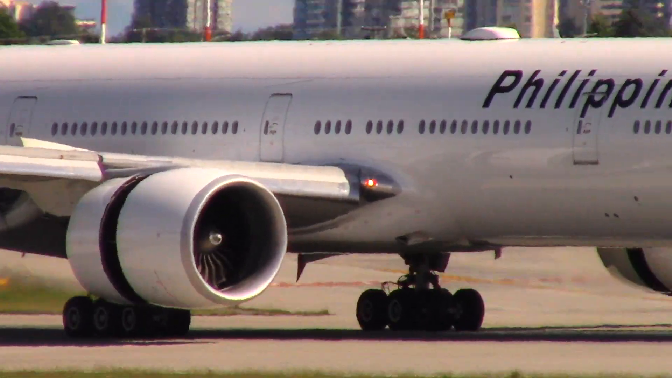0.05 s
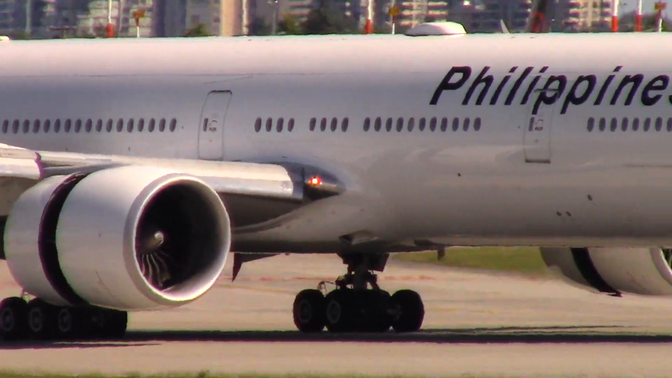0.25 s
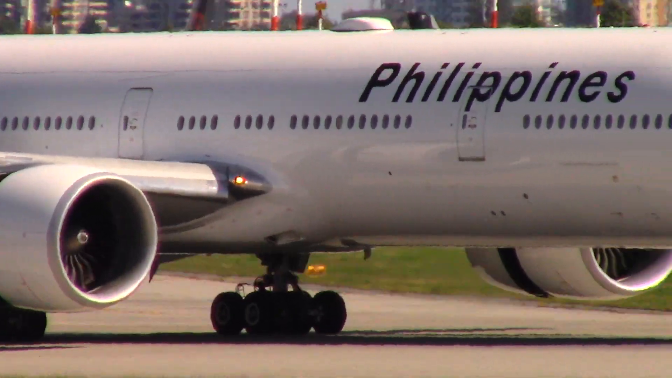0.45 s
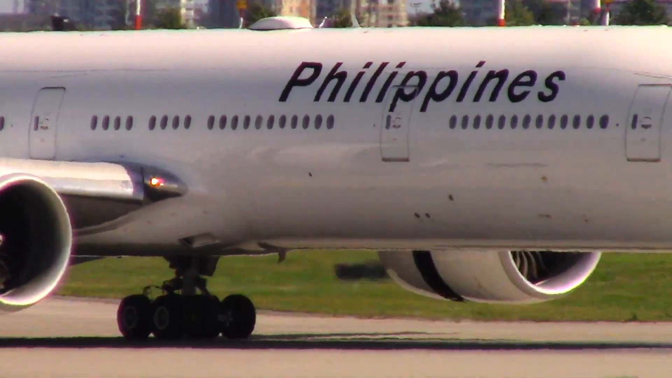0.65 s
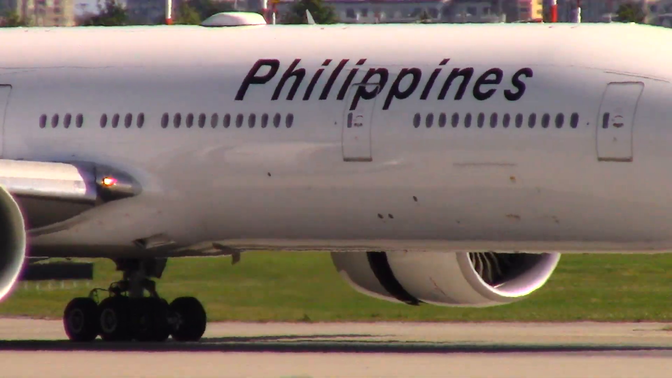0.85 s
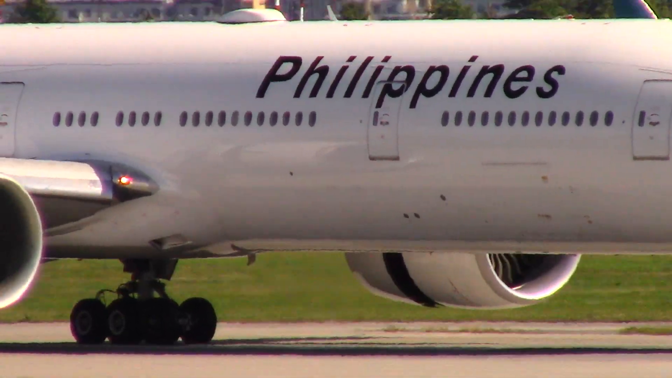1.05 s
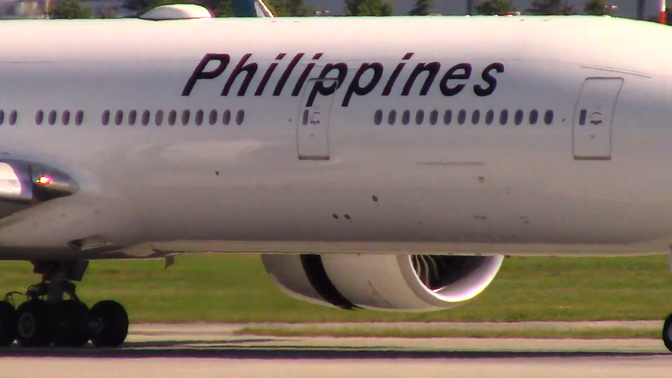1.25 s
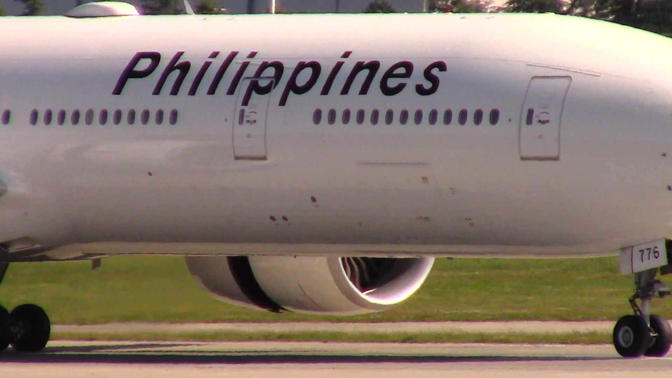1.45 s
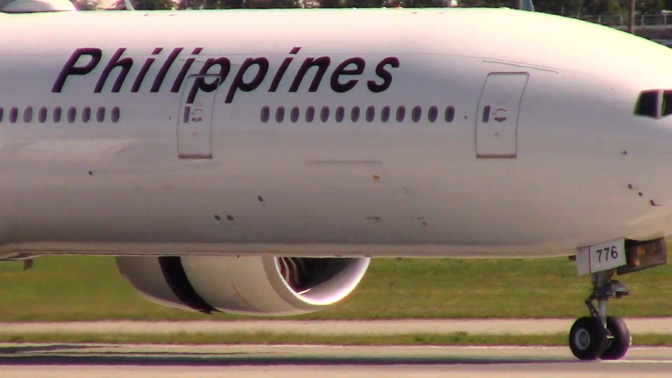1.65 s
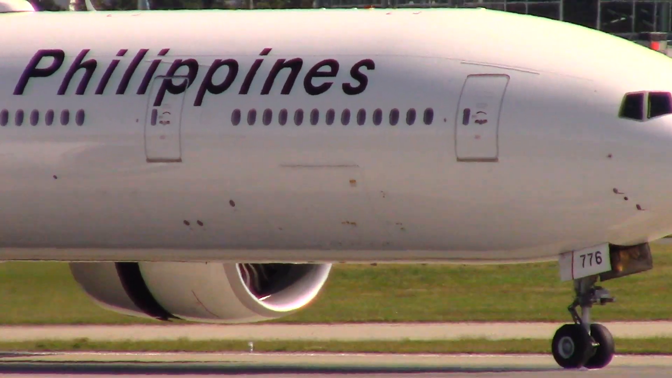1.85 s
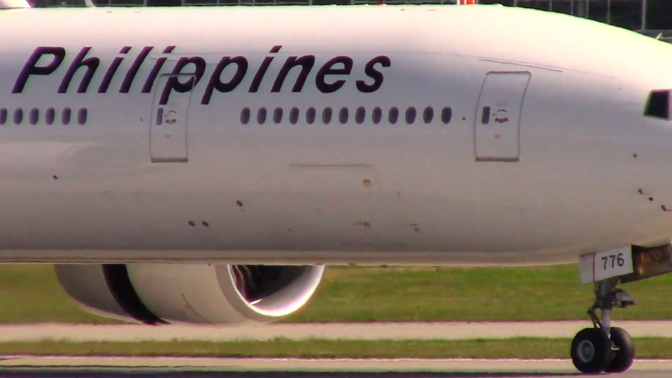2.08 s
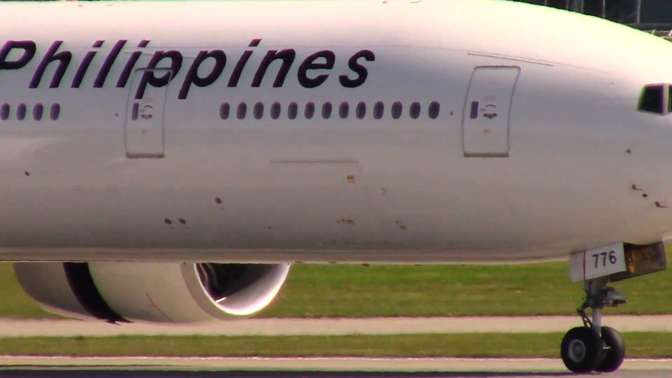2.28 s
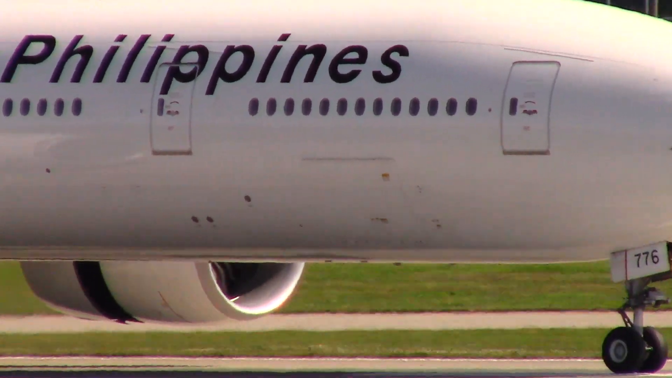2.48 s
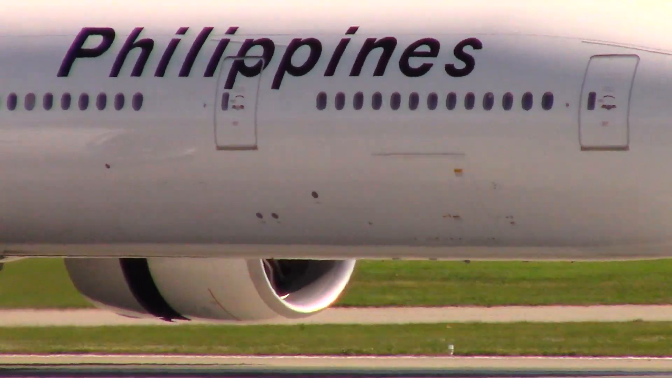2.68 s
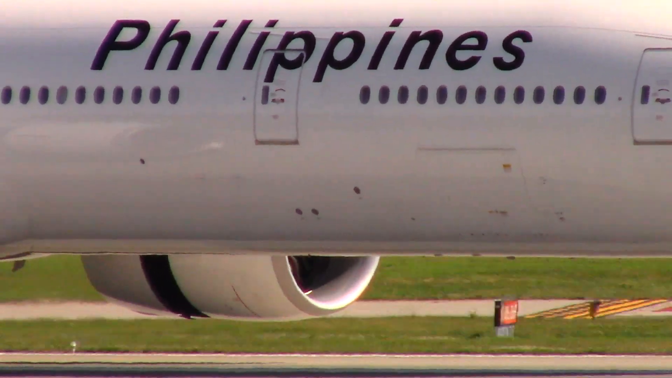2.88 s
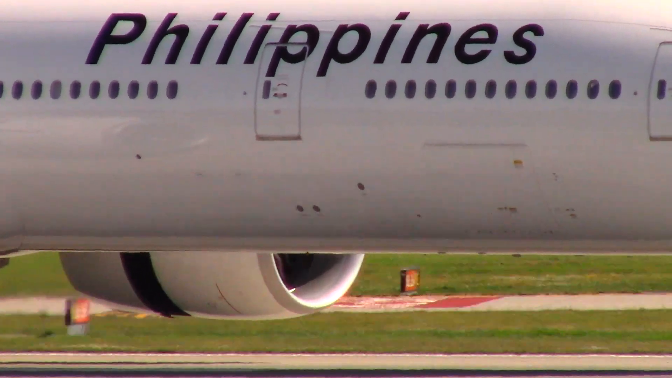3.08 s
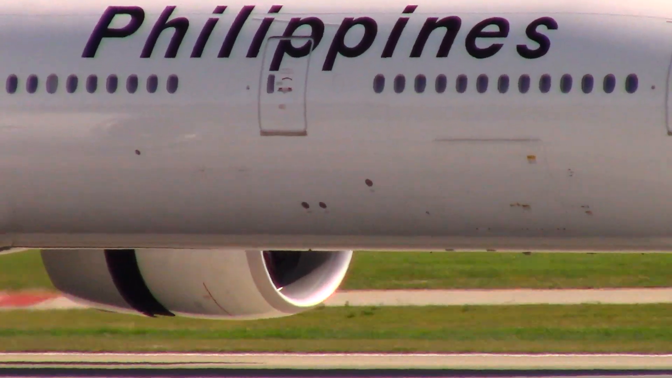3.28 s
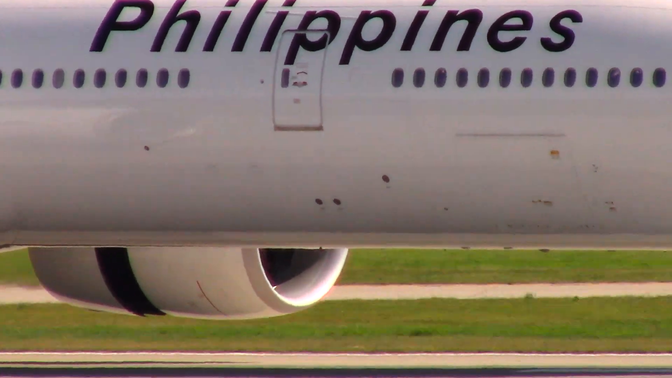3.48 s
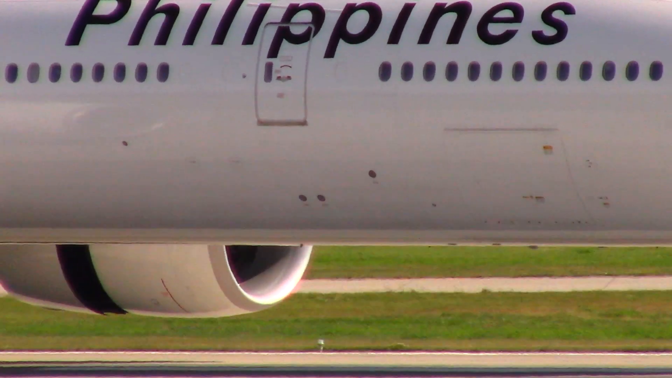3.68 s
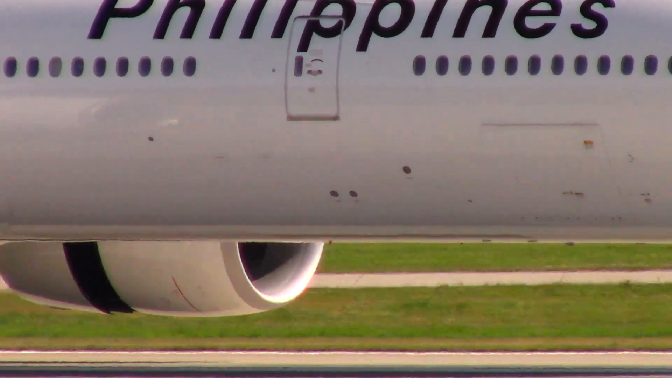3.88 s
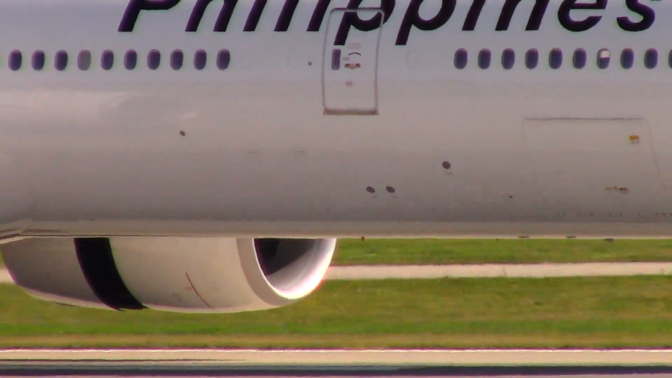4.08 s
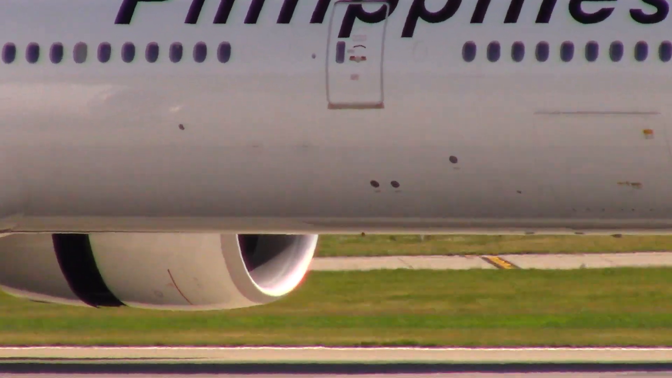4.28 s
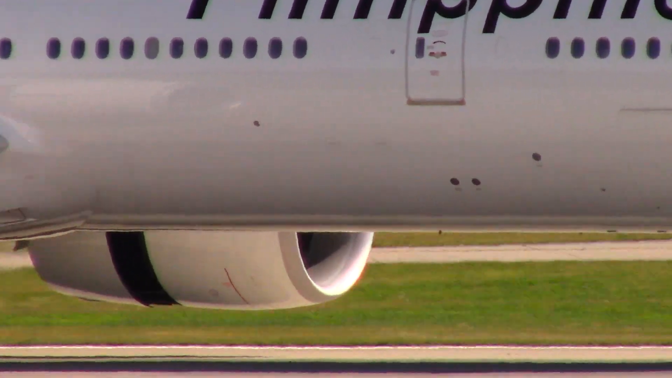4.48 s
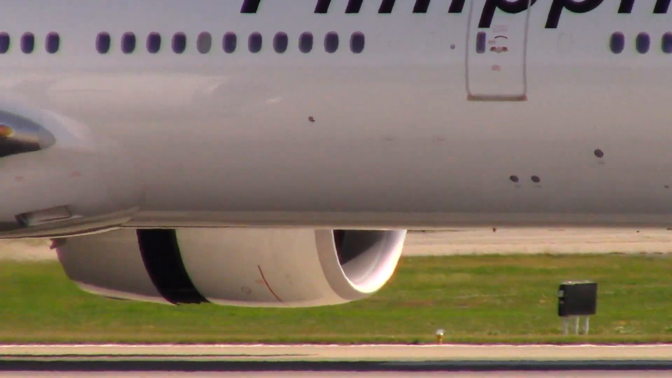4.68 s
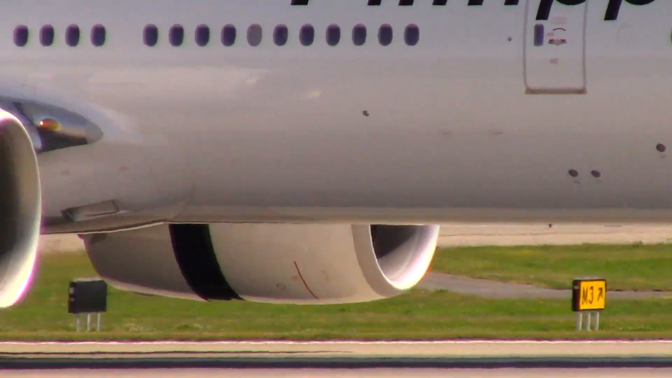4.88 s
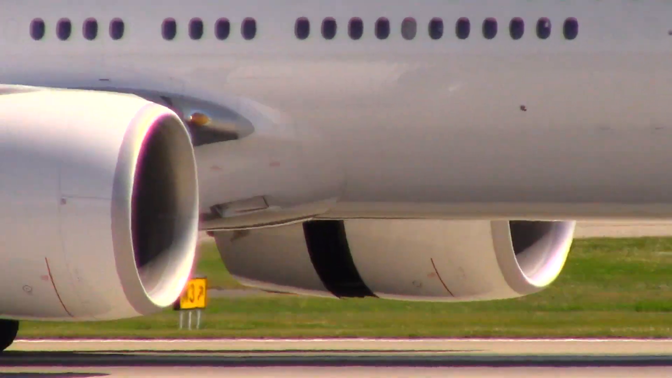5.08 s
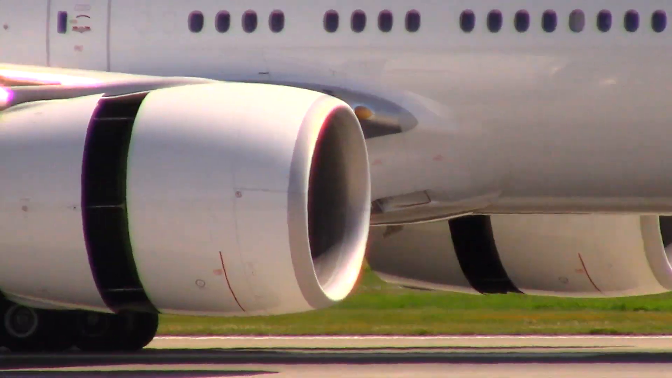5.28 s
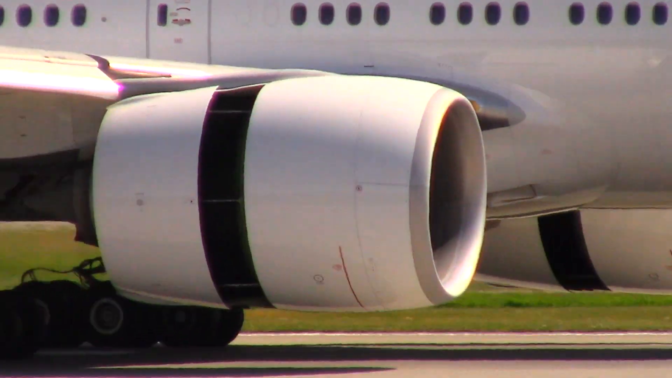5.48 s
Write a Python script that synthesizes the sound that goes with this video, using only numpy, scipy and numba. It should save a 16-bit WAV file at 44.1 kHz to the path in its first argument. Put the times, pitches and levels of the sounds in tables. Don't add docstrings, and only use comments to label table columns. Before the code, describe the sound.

A broad, turbulent jet roar builds beside a runway, threaded with flickering falling whines, early wind knocks and later faint overload crackle.

```python
import sys
import numpy as np
from scipy import signal
from scipy.fft import rfft, irfft
from scipy.io import wavfile
from scipy.ndimage import uniform_filter1d
from numba import njit

SR = 44100
rng = np.random.default_rng(int(sys.argv[2]) if len(sys.argv) > 2 else 0)


def wrap_up_sound(samples):
    columns = np.atleast_2d(samples).T
    tamed = np.clip(columns, -1, 1)
    steps = np.round(tamed * 32767).astype(np.int16)
    wavfile.write(sys.argv[1], SR, steps)


def boost_factor(decibels):
    exponent = np.asarray(decibels, float) / 20
    return 10 ** exponent


N = 244314
T = np.arange(N) / SR
HZ = np.maximum(np.fft.rfftfreq(N, 1 / SR), 1)


def shape(table, hz):
    table_hz, value = np.transpose(table)
    return np.interp(np.log(hz), np.log(table_hz), value)


def track(table):
    return np.interp(T, *np.transpose(table))


def bump(center_s, half_s):
    return np.exp(-((T - center_s) / half_s) ** 2)


def noise_spectrum(color, lo_hz, hi_hz):
    z = rfft(rng.standard_normal(N)) * boost_factor(shape(color, HZ))
    inside = (HZ > lo_hz) & (HZ < hi_hz)
    return z * N / np.sqrt(2 * np.sum(np.abs(z[inside]) ** 2))


def noise(color, lo_hz, hi_hz):
    return irfft(noise_spectrum(color, lo_hz, hi_hz), N)


def band(z, hz, octaves):
    offset = np.clip(np.log2(HZ / hz) / octaves, -1, 1)
    return irfft(z * np.cos(np.pi / 2 * offset) ** 2, N)


def walk(rate_hz):
    k = int(SR / rate_hz)
    held = rng.standard_normal(N // 200)[np.arange(N) // k]
    return 1.392 * uniform_filter1d(uniform_filter1d(held, k), k)


@njit
def svf(x, hz, width_hz):
    y, b, l = np.empty(len(x)), 0., 0.
    for i in range(len(x)):
        g, k = np.tan(np.pi * hz[i] / SR), width_hz / hz[i]
        v = (b + g * (x[i] - l)) / (1 + g * (g + k))
        b, l, y[i] = 2 * v - b, l + 2 * g * v, k * v
    return y


# start_s, level_db
ROAR_CORE = [(0, -36), (.5, -33.5), (.95, -28), (1.12, -26), (1.47, -23), (1.83, -29), (2.2, -26.5),
             (2.55, -23), (2.85, -22.5), (3.2, -19), (3.75, -17.5), (4.15, -18.5), (4.35, -19.5),
             (4.72, -24), (4.85, -20.5), (5.05, -17.5), (5.38, -21), (5.54, -21.5)]
# freq_hz, density_db_per_hz
JET_COLOR = [(150, -55.5), (300, -45), (400, -31), (540, -15), (820, -3.5), (1000, -4), (1370, 0),
             (1900, 0), (3500, -7), (4100, -10), (4900, -18), (5800, -24.5), (7000, -34.5), (11000, -65.5)]
# freq_hz, side_minus_mid_db
PORT_SIDE = [(250, -20.5), (700, -54), (1700, -48), (2500, -21), (3700, -22.5), (4600, -18), (5800, -11.5),
             (7200, -8.5), (9000, -11.5)]
ROAR_BANDS_HZ = [650, 1500, 4000, 6600, 8500]
LOSS_DB_PER_100M = [4.5, 0, 0.36, 7.5, 9]
FOLLOW_SHARE = [0.49, 0.91, 0.79, 0.52, 0.91]
# center_s, lift_db
FLARES = [(.8, 2), (1.28, 2), (2.2, 1), (2.48, 2), (2.8, 1), (3.15, 2), (4.11, 2), (4.83, 2), (5.03, 1.5)]
FLARE_SHARE = [0, 0, 0.91, .99, .99]


def roar():
    start_m, closing_m_s, near_m = 322.4, 30.2, 215.5
    swell_s, flare_s = 5.9, 0.07
    core_db = track(ROAR_CORE)
    swell_db = core_db - uniform_filter1d(core_db, int(swell_s * SR), mode="nearest")
    flare_db = sum(lift_db * bump(t, flare_s) for t, lift_db in FLARES)
    extra_m = start_m - closing_m_s * T - near_m
    mid = noise_spectrum(JET_COLOR, 900, 2200)
    side = noise_spectrum(JET_COLOR, 900, 2200) * boost_factor(shape(PORT_SIDE, HZ))
    surge = walk(8.4)
    near = walk(13.0)
    out = np.zeros((2, N))
    for hz in 200 * 2 ** np.arange(0, 6.1, 1 / 3):
        loss_db, follow, flare = (
            np.interp(np.log(hz), np.log(ROAR_BANDS_HZ), row)
            for row in (LOSS_DB_PER_100M, FOLLOW_SHARE, FLARE_SHARE))
        near = .8 * near + .6 * walk(7)
        db = core_db - (1 - follow) * swell_db - loss_db * extra_m / 100 + flare * flare_db
        db = db + .25 * surge + .25 * near + .7 * walk(12)
        out += boost_factor(db) * np.array([band(mid, hz, 1 / 3), band(side, hz, 1 / 3)])
    return out


# start_s, first_dip_hz, depth_0_1
GROUND_DIP = [(0, 795, 0.9), (1.5, 757, 0.92), (2.6, 712, 0.74), (3.999, 655, 0.79), (5.54, 656, 1)]


def ground(x):
    s, hz, depth = np.transpose(GROUND_DIP)
    return x - np.interp(T, s, depth) * svf(x, np.interp(T, s, hz), 200.0)


# center_hz, width_hz, depth_0_1
CASE_DIPS = [(2247, 190, 0.33), (2720, 370, 0.16), (4370, 150, 0.42), (5325, 780, 0.5)]


def camera_case(x):
    for hz, width_hz, depth in CASE_DIPS:
        x = x - depth * svf(x, np.full(N, 1. * hz), 1. * width_hz)
    return x


# start_s, pitch_hz, level_db
WHINE_A = [(0.0, 3067, -44.5), (0.6, 3047, -40.5), (1.27, 3003, -37), (2.11, 2924, -36.5), (2.7, 2862, -34),
           (3.38, 2793, -32.7), (3.75, 2758, -40)]
WHINE_B = [(2.4, 2570, -36), (2.88, 2542, -32.5), (3.6, 2516, -34.7), (4.08, 2474, -37.7),
           (4.56, 2385, -40.6)]
WHINE_C = [(1.1, 3325, -52), (1.27, 3320, -42), (1.4, 3315, -46), (1.6, 3295, -43), (1.9, 3250, -48),
           (2.3, 3195, -45), (2.6, 3160, -48)]
# center_s, lift_db
FOCUS_A = [(0.047, 6), (0.16, 6.5), (0.25, 7.5), (0.315, 5), (0.35, 9.5), (0.458, 8.5), (0.5, 6),
           (0.586, 12.5), (0.73, 6), (0.795, 7.5), (0.825, 12), (0.93, 11.5), (1.055, 4), (1.09, 5),
           (1.121, 9), (1.33, 4.5), (1.365, 10.5), (1.43, 7), (1.507, 6), (1.616, 9.5), (1.681, -11),
           (1.836, 5), (1.975, 9), (2.069, 7), (2.16, 4), (2.267, 7), (2.35, -1), (2.47, 6.5), (2.527, 10),
           (2.63, 4), (2.83, 4), (2.888, 12.5), (2.961, -2), (3.16, 5.5), (3.204, 12), (3.29, 5),
           (3.354, 5), (3.451, 13), (3.525, 14.5), (3.675, 17)]
FOCUS_B = [(2.49, 6.8), (2.541, 5.5), (2.69, 6), (2.73, 5.3), (2.906, 7), (3.049, 6.6), (3.122, 3.5),
           (3.17, 3.7), (3.222, 3.3), (3.374, 12), (3.598, 9.7), (3.691, 2.4), (3.852, 14), (4.072, 4.8),
           (4.189, 5.2), (4.364, 2.1), (4.421, 2.4), (4.536, 2.1)]
FOCUS_C = [(1.28, 14), (2.29, 4)]


def whine(blades, focus, steady=1.9, flicker_hz=190):
    s, hz, db = np.transpose(blades)
    pitch_hz = np.interp(T, s, hz) * (1 + .003 * walk(30))
    phase = 2 * np.pi * np.cumsum(pitch_hz) / SR
    edge = np.clip(np.minimum(T - s[0] + .1, s[-1] + .1 - T) / .1, 0, 1)
    burst_db = sum((1 + lift_db) * bump(t, 0.022) for t, lift_db in focus) - 5
    scattered = walk(flicker_hz) + 1j * walk(flicker_hz)
    paths = (steady + scattered) / np.sqrt(1 + steady ** 2 / 2)
    tone = edge * boost_factor(np.interp(T, s, db) + burst_db) * np.imag(paths * np.exp(1j * phase))
    return np.array([tone, boost_factor(-27.5) * tone])


def whines():
    return whine(WHINE_A, FOCUS_A) + whine(WHINE_B, FOCUS_B) + whine(WHINE_C, FOCUS_C)


# start_s, tick_db, thud_db
CRESTS = [(3.142, -49, -80), (3.164, -45, -75), (3.1924, -46.5, -76), (3.269, -49, -65), (3.2852, -43, -65),
          (3.347, -53, -68), (3.417, -48, -59), (3.4388, -46, -64), (3.4654, -49, -70), (3.5103, -41, -67),
          (3.574, -51, -69), (3.602, -44, -66), (3.6274, -45, -62), (3.6703, -47, -65),
          (3.6948, -46.5, -68), (3.7626, -44.5, -64), (3.7721, -51, -66), (3.7905, -43, -62),
          (3.815, -44.5, -61), (3.8569, -50, -66), (3.8783, -45, -62), (3.9457, -51, -71),
          (3.963, -49, -76), (4.0014, -53.5, -74), (4.015, -52, -80), (4.044, -48.5, -71),
          (4.0804, -46.5, -60), (4.0986, -40.5, -61), (4.1357, -48, -66), (4.178, -42, -64),
          (4.249, -49.5, -70), (4.272, -46, -66), (4.9235, -48.5, -74), (4.9524, -48, -71),
          (4.994, -52, -74), (5.006, -45, -70), (5.2178, -48.5, -78), (5.2492, -51.5, -74),
          (5.4632, -55, -69)]


def surges():
    return 1 + sum(.12 * boost_factor((db + 47) / 2) * bump(t + .0008, .004) for t, db, _ in CRESTS)


# freq_hz, density_db_per_hz
TICK_COLOR = [(300, -29.5), (3000, -4), (7000, -1), (10000, 7.5), (15500, 0.5)]


def ticks():
    tick_decay_s, tick_offset_db = .0022, -6.5
    thud_half_s, thud_offset_db = 0.00094, 13.5
    gain = sum(boost_factor(db + tick_offset_db) * (T > t) * np.exp(-np.abs(T - t) / tick_decay_s)
               for t, db, _ in CRESTS)
    signs = rng.choice([-1, 1], len(CRESTS))
    thud = sum(sign * boost_factor(db + thud_offset_db) * bump(t, thud_half_s)
               for sign, (t, _, db) in zip(signs, CRESTS))
    color = boost_factor(shape(TICK_COLOR, HZ))
    mid, side = (irfft(rfft(gain * rng.standard_normal(N)) * color, N) for _ in range(2))
    side = boost_factor(-12.0) * side + boost_factor(-16.0) * np.sign(walk(9)) * thud
    return np.array([mid + thud + side, mid + thud - side])


# freq_hz, density_db_per_hz
WIND_COLOR = [(60, -53), (130, -49.5), (205, -31.5), (350, -20), (770, -5.5), (1200, -7), (1700, -9),
              (2900, -15.5), (4500, -37.5), (9000, -83)]
# center_s, lift_db, half_s
GUSTS_LULLS = [
    (0, 5.5, 0.048),
    (0.448, 4.5, 0.043),
    (.64, -16, 0.077),
    (0.797, 0.5, 0.032),
    (1.648, -18, 0.065),
    (1.81, 0, 0.026),
    (2.07, 5.5, 0.051),
    (2.334, -30, 0.11),
]
# center_s, peak_db
PUFFS = [(0.091, -18.5), (0.16, -20.5), (0.212, -21), (0.237, -16), (0.261, -20), (0.301, -20),
         (0.432, -16.5), (0.466, -17), (0.506, -15), (0.551, -22), (0.683, -26), (0.82, -18),
         (0.876, -16.5), (0.908, -19), (0.975, -12), (1.101, -16), (1.274, -24), (1.402, -24),
         (1.547, -16.5), (1.571, -22), (1.654, -23), (1.696, -23), (1.811, -19.5), (1.85, -27),
         (1.983, -25), (2.076, -23), (2.125, -17), (2.201, -24.5), (2.335, -24)]
# freq_hz, density_db_per_hz
EDDY_COLOR = [(120, -66), (300, -27), (600, -3), (1000, 1.5), (1700, -1), (2500, -10), (4500, -42),
              (9000, -96)]
# start_s, level_db
CROSSWIND = [(0, -11.5), (.55, -13), (.75, -22), (.98, -7), (1.2, -22), (1.7, -24), (2, -16.5), (2.3, -25)]


def wind():
    level_db, fade_db_s, end_s, eddy_half_s = -52, 1.6, 2.5, .011
    db = level_db - fade_db_s * T + sum(lift_db * bump(t, half_s) for t, lift_db, half_s in GUSTS_LULLS)
    eddies = sum(boost_factor(peak_db - 12.0) * bump(t + .005, eddy_half_s) for t, peak_db in PUFFS)
    gain = np.clip((end_s - T) / 0.025, 0, 1) * boost_factor(db - 3.5 + 2.2 * walk(45.0))
    mid, side = (noise(WIND_COLOR, 220, 480) for _ in range(2))
    knock = eddies * noise(EDDY_COLOR, 300, 4500)
    return np.array([gain * mid + knock, boost_factor(track(CROSSWIND)) * (gain * side + 0.36 * knock)])


# freq_hz, density_db_per_hz
HISS_COLOR = [(3000, -13.5), (5500, 10), (9000, 6), (11000, 4), (13000, 1), (15000, 3), (16000, -3)]


def floor():
    hiss_db, hum_db = -65, -84
    duck_share = 0.14
    hum_color = [(20, 8.5), (200, 7.0), (400, -29.5)]  # freq_hz, density_db_per_hz
    hiss = [noise(HISS_COLOR, 7000, 16000) for _ in range(2)]
    hum = [noise(hum_color, 24, 400) for _ in range(2)]
    duck_db = -duck_share * (track(ROAR_CORE) + 27) + .4 * walk(6.2)
    hiss = boost_factor(hiss_db + duck_db) * np.array([boost_factor(-3.0 + 2.5 * duck_db) * hiss[0], hiss[1]])
    return hiss + boost_factor(hum_db) * np.array([hum[0], boost_factor(-2.5) * hum[1]])


def scene():
    tones = whines()
    jet = roar()
    jet[0] = camera_case(ground(jet[0]))
    mid, side = (jet + boost_factor(2.0) * tones) * surges() + wind() + floor()
    return np.array([mid + side, mid - side])


def low_pass(x):
    return signal.sosfilt(signal.butter(12, 15720, fs=SR, output="sos"), x)


def record(dry):
    knee = 0.28
    over = dry - np.clip(dry, -knee, knee)
    bent = dry - 1.1 * over * np.minimum(np.abs(over), .36) + ticks()
    dull = signal.sosfilt(signal.butter(2, 13000, fs=SR, output="sos"), bent)
    return low_pass(dull)


dry = scene()
out = record(dry)
wrap_up_sound(out)
```